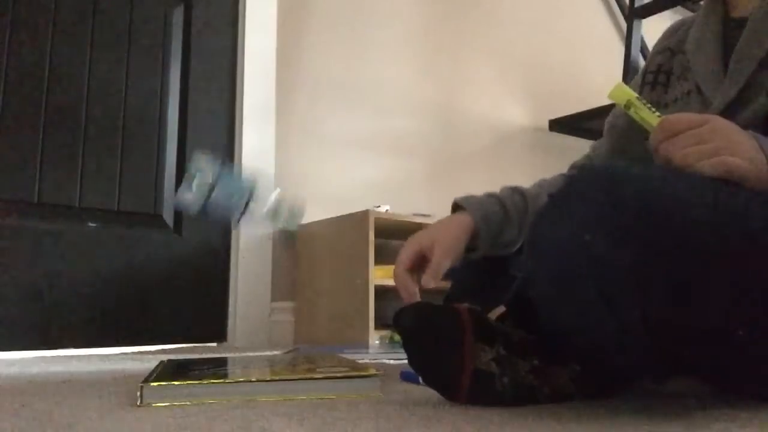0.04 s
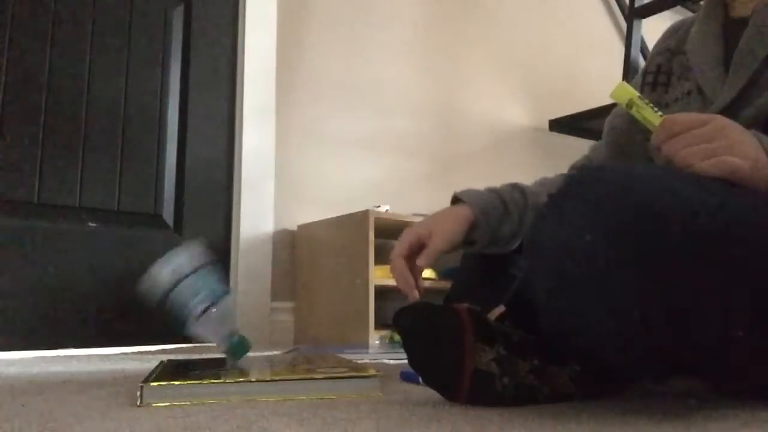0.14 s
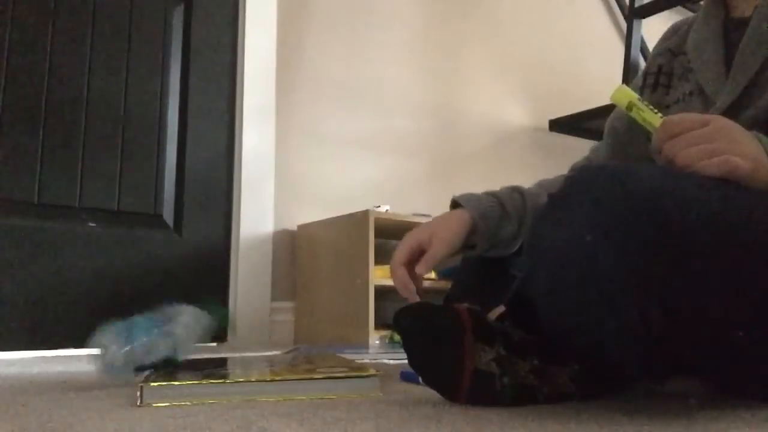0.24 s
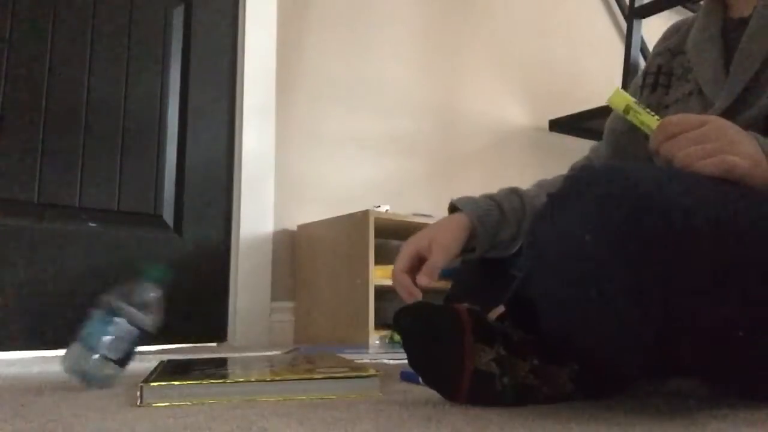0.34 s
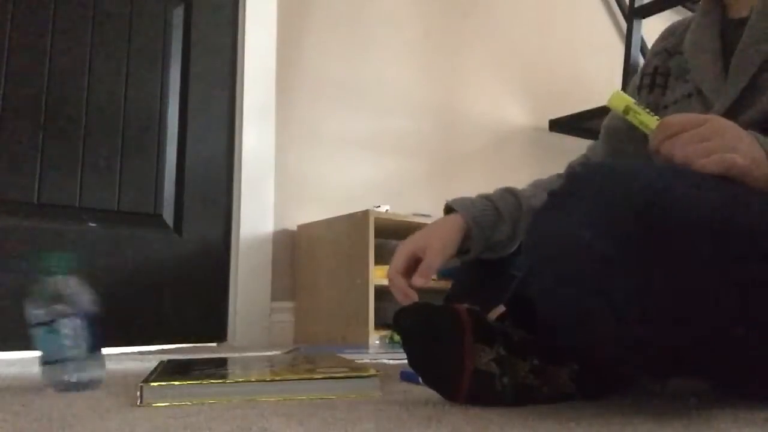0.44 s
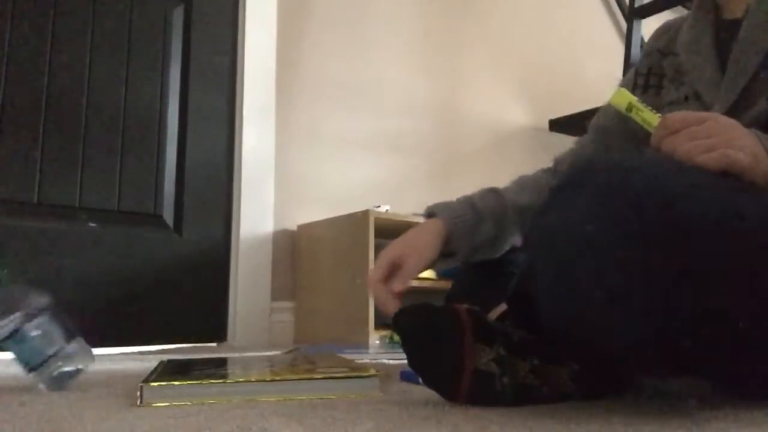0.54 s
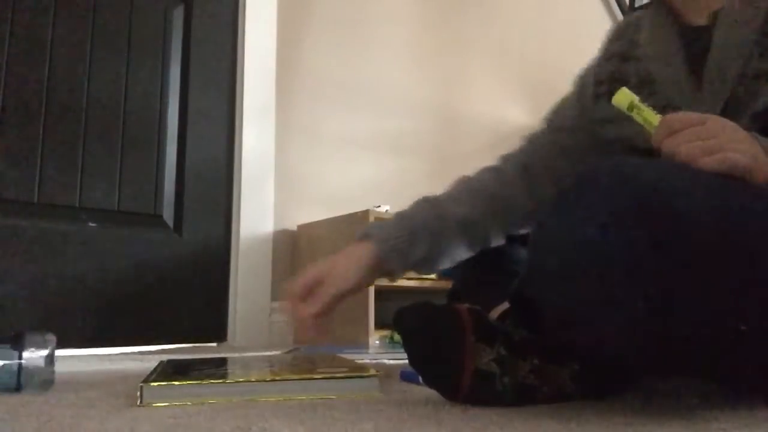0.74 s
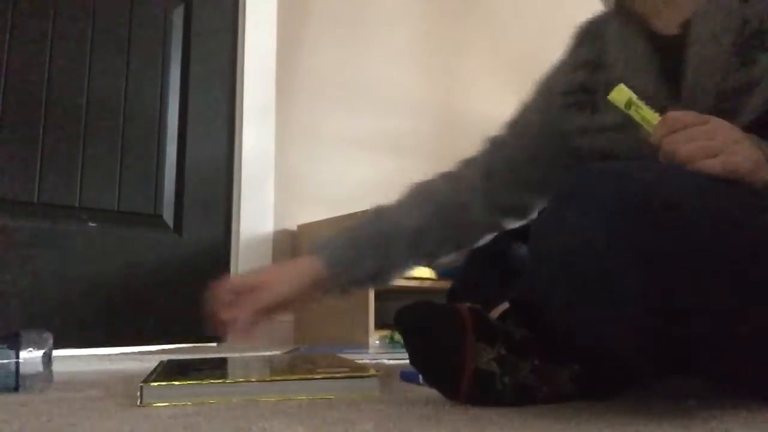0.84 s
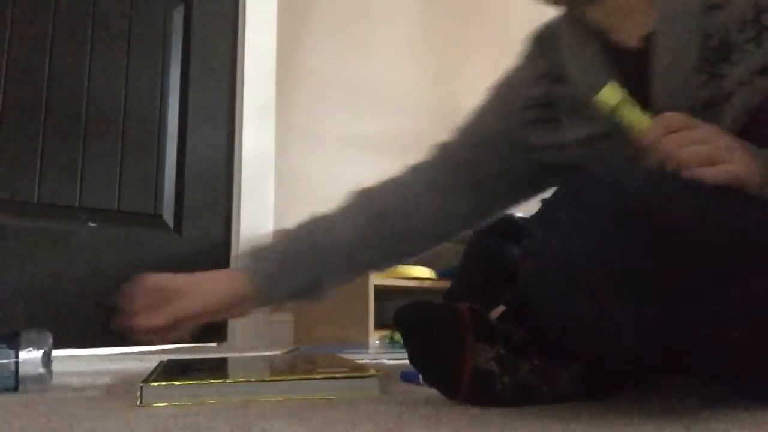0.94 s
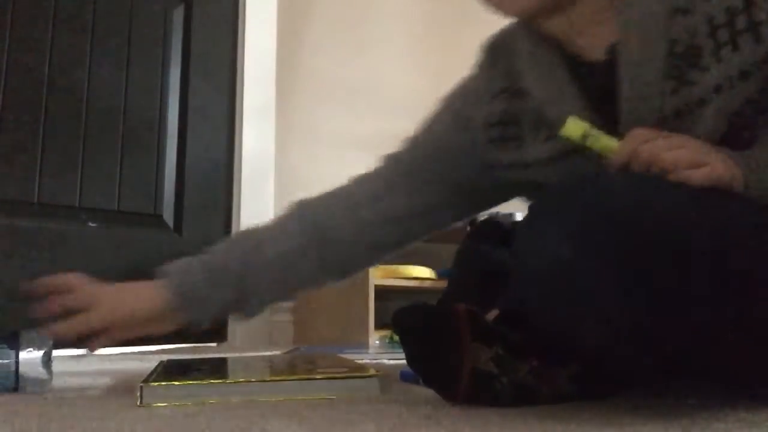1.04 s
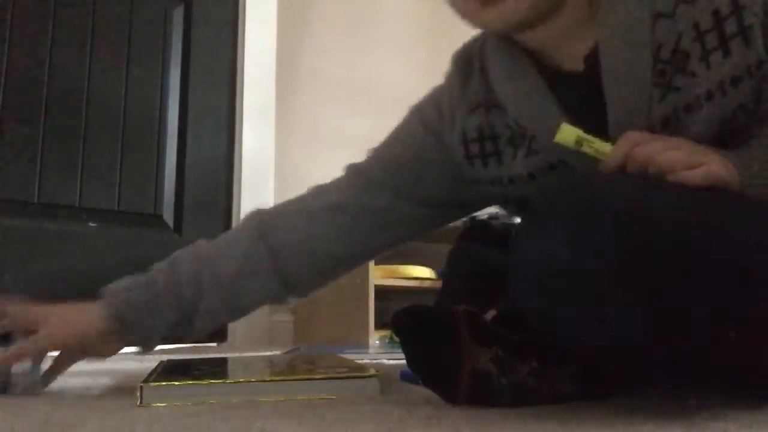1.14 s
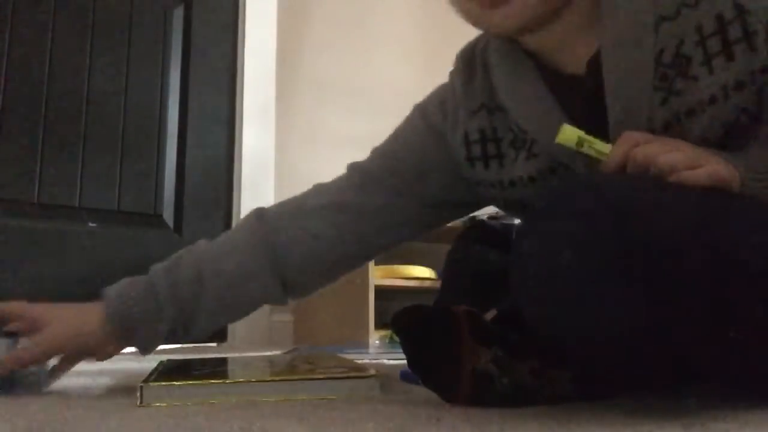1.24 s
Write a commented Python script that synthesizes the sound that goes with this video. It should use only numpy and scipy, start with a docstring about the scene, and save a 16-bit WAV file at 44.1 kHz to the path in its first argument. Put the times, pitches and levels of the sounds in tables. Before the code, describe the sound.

A part-filled plastic water bottle, faintly sloshing in flight, lands on a book at about 0.24 seconds with a loud, hollow knock, a dull thud and splashy rattle until 0.4. A weaker bounce clicks at 0.48-0.53. After a quiet gap, it topples with small plastic knocks and cap taps at 0.83-0.91. Soft handling bumps and crackles follow at 1.19-1.3. Close, small carpeted room, faint hum and hiss.

```python
"""A part-filled plastic bottle is flipped in a carpeted room, lands with a hard hollow knock on a book,
bounces, topples with taps of its cap, and is picked up. Its wall rings near 300 Hz as decaying sines that
the water smothers; damped modes make the plastic tick, and dense grains in three bands make it rattle
and the water slosh. Low sines thud, filtered noise rumbles, feedback delays give the room, and
a low hum wavers under it all in faint noise."""
import sys
import numpy as np
from scipy import signal
from scipy.io import wavfile

SR = 44100
rng = np.random.default_rng(int(sys.argv[2]) if len(sys.argv) > 2 else 0)


def inscribe(sig):
    """Save sig as 16-bit PCM at rate SR to the path in sys.argv[1].

    A 1-D sig is mono; a 2-D sig holds one channel per row.
    Samples are clipped to [-1, 1] before scaling.
    """
    pcm = np.round(np.clip(np.atleast_2d(sig).T, -1, 1) * 32767)
    wavfile.write(sys.argv[1], SR, pcm.astype(np.int16))


N = 57330   # samples, 1.3 s

# Modes of the bottle's plastic. Each row: frequency in Hz, relative level in dB, 60 dB decay time in seconds.
PLASTIC_MODES = [(426, 3, .08), (496, -6.5, 0.018), (598, -5.5, 0.042), (740, -7, 0.14), (796, -6.5, 0.11),
                 (1036, -6, 0.066), (1240, -14.5, 0.069), (1370, -2.5, 0.025), (1606, -4, 0.02),
                 (1650, -16.5, .04), (2250, -5, .03), (2580, -7, 0.043), (3310, -10.5, 0.014),
                 (4620, -28, 0.0257), (5450, -9.5, 0.017), (6600, -12.5, 0.025), (8150, -5, 0.024),
                 (12000, -13.5, .01), (13150, -6.5, .01), (14000, -7.5, .01)]


def from_db(db):
    """Level to amplitude: 20 dB is a factor of ten."""
    return 10 ** (np.asarray(db) / 20)


def rms_one(x):
    """Normalization: scale to a root mean square of 1."""
    return x / np.sqrt(np.mean(x ** 2) + 1e-20)


def band(x, low_hz, high_hz):
    """Band limitation: Butterworth band-pass, then rms 1."""
    sos = signal.butter(2, [low_hz, high_hz], "band", fs=SR, output="sos")
    return rms_one(signal.sosfilt(sos, x))


def resonate(x, hz, width_hz):
    """Resonance: a pole pair whose radius sets the bandwidth, with a gain of about 1 at its peak."""
    r = np.exp(-np.pi * width_hz / SR)
    zeros = np.array([1, 0, -1]) * (1 - r * r) / 2
    poles = [1, -2 * r * np.cos(2 * np.pi * hz / SR), r * r]
    return signal.lfilter(zeros, poles, x)


def since(s):
    """Elapsed time: seconds after s, zero before."""
    return np.maximum(np.arange(N) / SR - s, 0)


def level_curve(s, db):
    """Slow level change: amplitude from breakpoints joined by straight lines in dB."""
    return from_db(np.interp(np.arange(N) / SR, s, db))


def dying(t, t60, rise_s):
    """Damped response: quick rise, then exponential decay by 60 dB in t60 seconds."""
    return (1 - np.exp(-t / rise_s)) * from_db(-60 * t / t60)


def sine(hz, t):
    """Simple harmonic motion, starting from zero."""
    return np.sin(2 * np.pi * hz * t)


def wall():
    """Hollow ring: pitch climbs as the dented wall springs back, and water damps it."""
    # Rings of the wall. Each row: start in seconds, level in dB before rise and decay, settled pitch in Hz,
    # 60 dB decay time in seconds, time from start until the water smothers it in seconds.
    ring_table = [(.018, -53, 328, 0.17, .03), (.047, -48, 292.4, 0.14, 0.051),
                  (0.237, -6, 300.8, 0.16, .0315), (0.271, -28, 237.3, .4, .045),
                  (.273, -30.5, 399.6, .3, 0.0357), (.292, -35, 324, 0.2, 0.021),
                  (0.3204, -26, 297.7, 0.25, 0.054), (0.401, -49.5, 299, 0.66, 0.048),
                  (0.488, -43, 290, 0.24, 0.017), (0.879, -46, 300, 0.3, 0.03),
                  (0.904, -36.5, 316, .15, 0.048), (1.1885, -33.5, 331, 0.034, 0.0099),
                  (1.254, -35.5, 283, 0.077, 0.023)]
    squash_share, full_blow_db = 0.27, -4.5   # a blow at this level starts flat by this share of its pitch
    spring_back_s, smother_s = 0.011, 0.00085
    out = np.zeros(N)
    for s, db, hz, t60, held in ring_table:
        t = since(s)
        squash = squash_share * from_db(db - full_blow_db)
        # time lag of the phase, the integral of the dying pitch drop
        dent = squash * spring_back_s * (1 - np.exp(-t / spring_back_s))
        smother = np.exp(-np.maximum(t - held, 0) / smother_s)
        out += from_db(db) * dying(t, t60, 0.00074) * smother * sine(hz, t - dent)
    return out


def slaps():
    """Impulsive onset: heavily damped sines; the bright ones pull first, the dull ones push."""
    # Flat slaps that open a blow. Each row: start in seconds, level in dB before decay,
    # frequency in Hz, 60 dB decay time in seconds.
    slap_table = [(.2363, -12.5, 1527, 0.0073), (.2376, -11.5, 552, 0.016), (0.4796, -29, 1350, 0.0058)]
    out = np.zeros(N)
    for s, db, hz, t60 in slap_table:
        t = since(s)
        push = -np.sign(hz - 1000)
        out += push * from_db(db - 60 * t / t60) * sine(hz, t)
    return out


def grains():
    """Random point process: 7000 clicks per second on average, of uneven size and either sign."""
    drops_per_s, drop_spread_db = 7000, 3.0
    sizes = from_db(drop_spread_db * np.minimum(rng.exponential(1, N), 5)) * rng.choice([-1, 1], N)
    return sizes * (rng.random(N) < drops_per_s / SR)


def shaken_plastic(rings_db, widens):
    """Forced vibration: bare grains plus grains through the plastic's modes, broadened by widens."""
    shaken = grains()
    rung = np.zeros(N)
    for hz, db, t60 in PLASTIC_MODES:
        width_hz = widens * np.log(1000) / np.pi / t60   # shorter decay, wider resonance
        rung += from_db(db) * rms_one(resonate(shaken, hz, width_hz))
    return rms_one(grains()) + from_db(rings_db) * rms_one(rung)


def contacts():
    """Modal excitation: each contact knocks the modes near its centre and leaves a dying rattle."""
    # Contacts of plastic. Each row: start in seconds, relative knock level in dB, knock centre in Hz,
    # knock spread in octaves, low, middle and high rattle level in dB before rise and decay,
    # 60 dB decay time of the rattle in seconds.
    contact_table = [(.020, -37.5, 600, 0.2, -62, -83, -81, 0.18),
                     (.119, -68, 3500, 1.0, -73, -62.5, -65, 0.058),
                     (.150, -56, 6500, 0.65, -62, -63.5, -72, 0.047),
                     (.2285, -23, 3390, 0.16, -71, -74, -83, 0.033),
                     (.2364, -14, 1503, 1.64, -46, -30.5, -30.5, 0.11),
                     (.243, -36, 700, 0.34, -34.5, -55, -39.5, 0.22),
                     (0.246, -25, 1400, 0.33, -51.5, -49, -51.5, 0.033),
                     (.263, -21, 1400, .15, -54.5, -50, -50, 0.044),
                     (.277, -31, 1400, .15, -61, -48.5, -57.5, .04),
                     (.305, -34, 12000, 1, -42, -51, -46, 0.065),
                     (.311, -60, 3500, 0.35, -55, -46, -46, 0.055),
                     (.330, -54, 12500, .4, -50, -53, -47, .04),
                     (0.3757, -44, 3400, 0.23, -75, -45.5, -41, 0.03),
                     (.445, -42.5, 8100, .4, -97, -61, -55, .04),
                     (0.481, -41.5, 1550, 0.17, -62, -52, -52.5, 0.042),
                     (0.4832, -29.5, 1590, 0.49, -44.5, -70, -61, .06),
                     (.4925, -36, 5360, .25, -64, -52, -73.5, 0.04),
                     (.517, -54.5, 4450, 0.17, -55, -93, -73, 0.11),
                     (0.504, -62, 5400, 0.34, -78, -73, -67, 0.046),
                     (0.532, -27, 13500, 0.26, -71.5, -52, -53, .08),
                     (.768, -75, 13500, 0.36, -72.5, -70, -64.5, 0.23),
                     (.829, -45, 1800, 0.88, -62.5, -89, -85, 0.25),
                     (.842, -43, 2700, 0.53, -82, -70, -66, 0.13),
                     (.877, -27, 600, 0.1, -66, -76, -55, 0.055),
                     (.8845, -30, 657, 0.14, -56.5, -67, -66, 0.078),
                     (.8805, -25.5, 6000, 0.22, -65, -58, -58, 0.058),
                     (0.905, -74, 2500, 1.3, -65.5, -51.5, -50, .15),
                     (1.187, -48, 453, 0.4, -71, -65.5, -65, 0.18),
                     (1.212, -50.5, 2660, 0.57, -75, -72, -59.5, 0.039),
                     (1.249, -41, 863, 0.54, -56, -58.5, -58, 0.18),
                     (1.261, -42.5, 875, 0.77, -56, -58, -60, 0.081),
                     (1.281, -46, 4500, 0.62, -65, -49, -52, 0.035)]
    out = np.zeros(N)
    luck = rng.normal(0, 1.5, (len(contact_table), len(PLASTIC_MODES)))   # level scatter, dB
    rattle = shaken_plastic(rings_db=-2, widens=8.7)
    registers = band(rattle, 350, 1890), band(rattle, 2500, 7700), band(rattle, 9600, 18800)
    for (s, db, centre_hz, spread, low_db, mid_db, high_db, t60), chance in zip(contact_table, luck):
        t = since(s)
        for (hz, mode_db, mode_t60), c in zip(PLASTIC_MODES, chance):
            octaves = np.log2(hz / centre_hz)
            share = np.exp(-(octaves / spread) ** 2 / 2)
            sign = -np.sign(np.cos(3 * octaves))   # polarity alternates away from the centre
            knock = from_db(db + mode_db - 12.5 + c - 60 * t / mode_t60) * sine(hz, t)
            out += sign * share * knock
        out += dying(t, t60, 0.00017) * (from_db([low_db, mid_db, high_db]) @ registers)
    return out


def cap():
    """Modal impact: quick taps ring the cap's modes, which shiver on roughly after the last tap."""
    # Taps of the hard cap. Each row: start in seconds, level in dB to which each mode's level is added.
    tap_table = [(0.901, -52.5), (.9040, -52.5), (0.906, -39.5)]
    # Modes of the cap. Each row: frequency in Hz, relative level in dB, 60 dB decay time of a tap in seconds.
    cap_modes = [(1380, -1, .03), (1630, -2, .035), (3210, -2, .03), (4450, -3, .025), (6290, -7, .02),
                 (11700, -10, .015), (12900, -8, .018)]
    buzz_db, buzz_t60_s = -55, 0.16
    luck = rng.normal(0, 1.5, (len(tap_table), len(cap_modes)))   # level scatter, dB
    taps = np.zeros(N)
    for (s, db), chance in zip(tap_table, luck):
        t = since(s)
        for (hz, mode_db, t60), c in zip(cap_modes, chance):
            taps += from_db(db + mode_db + c - 60 * t / t60) * sine(hz, t)
    shaken = grains()
    buzz = np.zeros(N)
    for hz, mode_db, _ in cap_modes:
        width_hz = 230 * hz / 3000   # the same relative bandwidth for every mode
        buzz += from_db(mode_db) * resonate(shaken, hz, width_hz)
    last_tap_s = tap_table[-1][0]
    return taps + from_db(buzz_db) * dying(since(last_tap_s), buzz_t60_s, 0.0013) * rms_one(buzz)


def slosh():
    """Granular excitation: water running inside, as fine grains that also shake the plastic's modes."""
    # Water sloshing. Each row: time in seconds, low, middle and high register level in dB.
    slosh_table = [(0, -60, -55.5, -56), (0.031, -65, -57, -49.5), (0.057, -65, -53, -54),
                   (.095, -68, -65.5, -72), (0.192, -85, -81.5, -102), (0.233, -55, -104, -102),
                   (.246, -31, -57, -52), (.29, -45.5, -53, -50), (.372, -52, -55, -53.5),
                   (.395, -67, -54.5, -51), (.42, -58.5, -66, -59.5), (.47, -68, -64, -61.5),
                   (.52, -67.5, -59.5, -62), (.55, -63, -77, -62), (0.598, -73.5, -87.5, -79),
                   (.9, -74, -68.5, -75), (.925, -65, -63.5, -79), (0.991, -72.5, -75.5, -78),
                   (1.17, -73.5, -87, -89), (1.245, -67.5, -68, -61.5), (1.3, -67, -64, -62)]
    s, *levels = np.transpose(slosh_table)
    water = shaken_plastic(rings_db=-5, widens=1.5)
    registers_hz = (450, 2900), (2000, 5300), (10500, 21000)
    out = np.zeros(N)
    for db, (low_hz, high_hz) in zip(levels, registers_hz):
        out += level_curve(s, db) * band(water, low_hz, high_hz)
    return out


def thuds():
    """Damped oscillation: low swings of the floor, soon stopped."""
    # Dull thuds through the floor. Each row: start in seconds, level in dB before rise and decay,
    # frequency in Hz, 60 dB decay time in seconds, time from start until it is stopped in seconds.
    thud_table = [(0.24, -38.5, 174, 0.04, .1), (0.239, -24.5, 114.3, .2, .1), (0.308, -38.5, 91, 0.28, .1),
                  (0.499, -37.5, 59.3, 0.14, 0.082), (.783, -34.5, 82.3, 0.43, 0.0167),
                  (1.198, -39, 185, 0.058, 0.037), (1.255, -34.5, 118, 0.13, .05)]
    out = np.zeros(N)
    for s, db, hz, t60, held in thud_table:
        t = since(s)
        stop = np.exp(-since(s + held) / 0.0033)
        out += from_db(db) * dying(t, t60, .003) * stop * sine(hz, t)
    return out


def rumble():
    """Low-frequency random vibration: noise around 40 to 95 Hz that swells with movement."""
    # Bodies moving on the floor. Each row: time in seconds, level in dB.
    rumble_table = [(0.0, -78), (0.046, -56.5), (0.206, -52), (0.252, -31.5), (0.484, -56.5), (0.51, -45.5),
                    (0.592, -78), (0.662, -64), (0.748, -55), (0.788, -47.5), (0.954, -62), (1.194, -52),
                    (1.22, -49), (1.3, -79)]
    s, db = np.transpose(rumble_table)
    low_noise = band(rng.standard_normal(N + SR), 40, 95)[-N:]   # the filter settles first
    return level_curve(s, db) * low_noise


def room(x):
    """Reverberation: twelve feedback delays, each duller and weaker on every round."""
    t60_s, wall_cut_hz = 0.36, 5000
    out = np.zeros(N)
    dull = np.exp(-2 * np.pi * wall_cut_hz / SR)
    lags = (np.geomspace(.011, .041, 12) * SR).astype(int)   # seconds to samples
    for k, lag in enumerate(lags):
        loop = x.copy()
        gain = from_db(-60 * lag / SR / t60_s)
        state = [0.]
        for i in range(lag, N, lag):
            last_round = loop[i - lag:i]
            back, state = signal.lfilter([gain * (1 - dull)], [1, -dull], last_round, zi=state)
            loop[i:i + lag] += back[:N - i]
        out += (loop - x) * (-1) ** k
    return out


def air():
    """Stationary noise: half-octave bands of room noise, and a hum wavering as narrow-band noise."""
    # Spectrum of the room noise. Each row: frequency in Hz, relative level in dB per Hz.
    air_table = [(82, -26), (140, -14.5), (233, -11), (444, -18.5), (540, -29.5), (952, -25.5),
                 (1380, -26.5), (1710, -37.5), (2210, -29), (4550, -37.5), (15000, -32)]
    # Level of the hum. Each row: time in seconds, level in dB.
    hum_table = [(0.0, -56), (0.212, -56.5), (0.56, -61.5), (0.648, -56.5), (1.118, -54), (1.3, -48)]
    air_db, hum_hz, hum_width_hz = -69, 116.2, 12
    edges = 140 * 2 ** np.arange(0, 7.1, .5)
    white = rng.standard_normal((3, N + SR // 2))   # the first half second lets the filters settle
    hz, db = np.transpose(air_table)
    noise = 0
    for k, (low_hz, high_hz) in enumerate(zip(edges, edges[1:])):
        density_db = np.interp(np.log(low_hz * high_hz) / 2, np.log(hz), db)
        # neighbouring bands use separate noises
        noise = noise + from_db(density_db) * np.sqrt(high_hz - low_hz) * band(white[k % 2], low_hz, high_hz)
    hum = resonate(resonate(white[2], hum_hz, hum_width_hz), hum_hz, 2 * hum_width_hz)
    hum_level = level_curve(*np.transpose(hum_table))
    return from_db(air_db) * rms_one(noise[-N:]) + hum_level * rms_one(hum[-N:])


def scene():
    """Superposition: bottle, its reverberation, water, floor and room noise add up."""
    room_db, wall_in_room_db = -21.5, -5
    ring = wall()
    knocks = contacts() + slaps() + cap() + 1e-18   # an inaudible offset
    echoes = from_db(room_db) * room(knocks + from_db(wall_in_room_db) * ring)
    mix = ring + knocks + echoes + thuds() + slosh() + rumble() + air()
    return mix[None]


def record(dry):
    """Transducer response: the microphone lifts the top treble, drops the deep bass and cuts the top."""
    peak_hz, peak_width_hz, peak_db = 13500, 5300, 3.5
    low_cut_hz, cutoff_hz = 79, 15350
    bright = dry + (from_db(peak_db) - 1) * resonate(dry, peak_hz, peak_width_hz)
    low_cut = signal.butter(2, low_cut_hz, "high", fs=SR, output="sos")
    top_cut = signal.ellip(10, .5, 70, cutoff_hz, fs=SR, output="sos")
    return signal.sosfilt(top_cut, signal.sosfilt(low_cut, bright))


dry = scene()
out = record(dry)
inscribe(out)
```